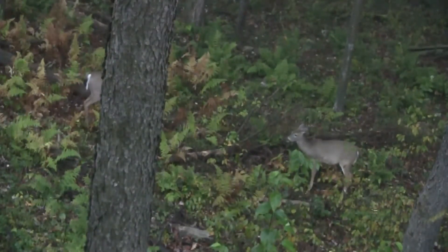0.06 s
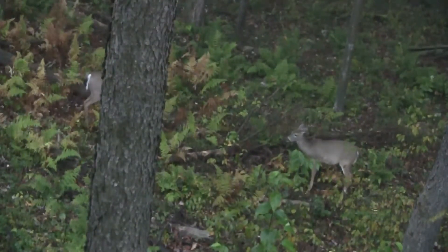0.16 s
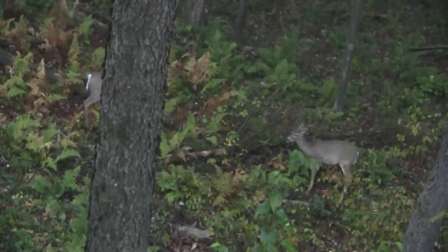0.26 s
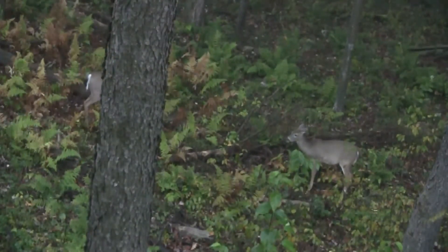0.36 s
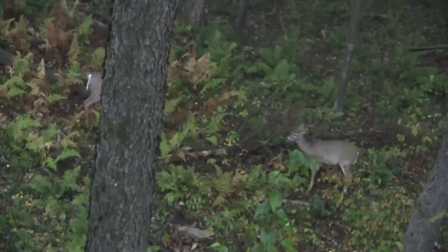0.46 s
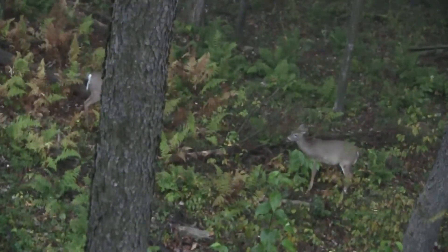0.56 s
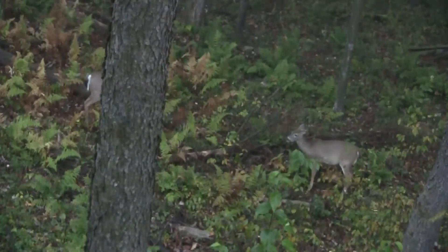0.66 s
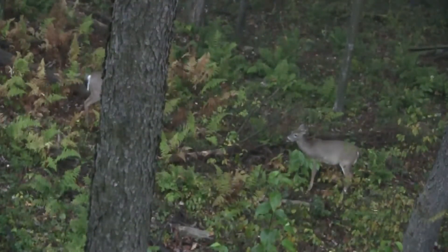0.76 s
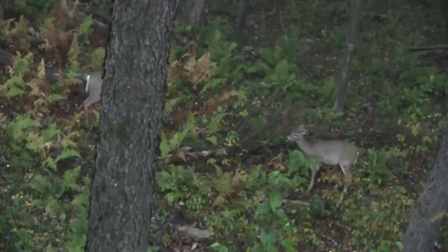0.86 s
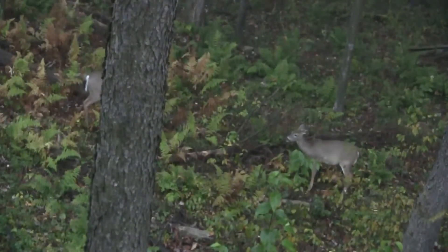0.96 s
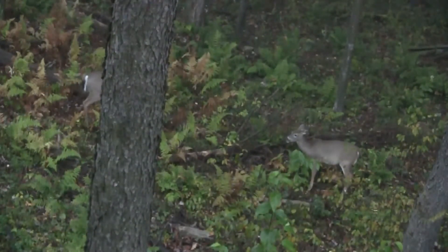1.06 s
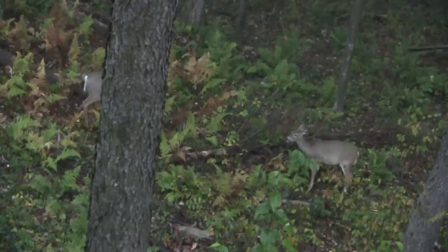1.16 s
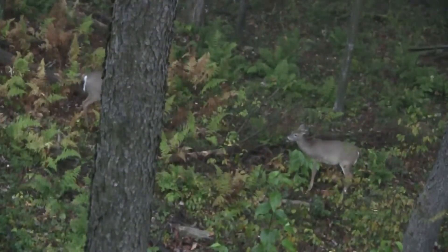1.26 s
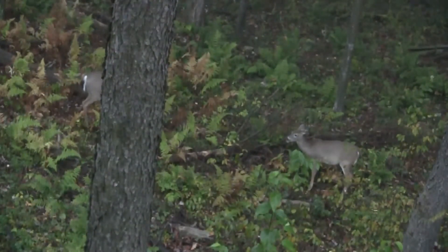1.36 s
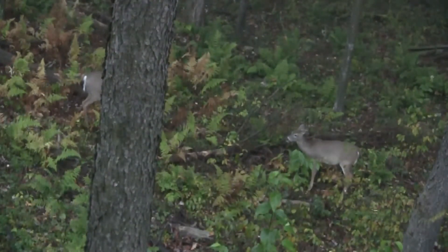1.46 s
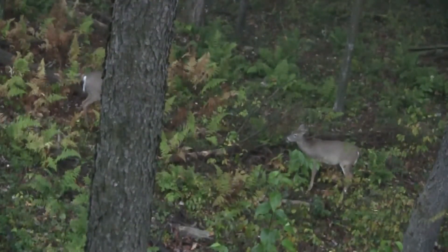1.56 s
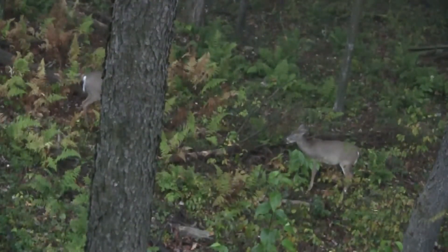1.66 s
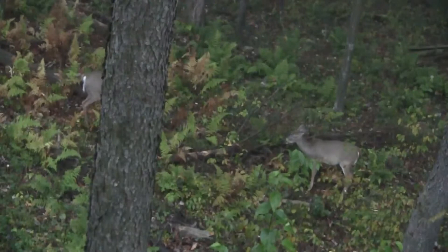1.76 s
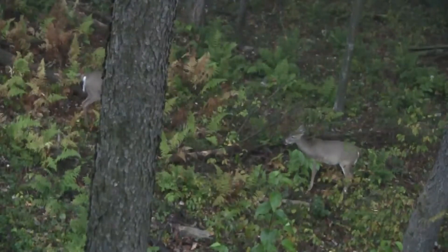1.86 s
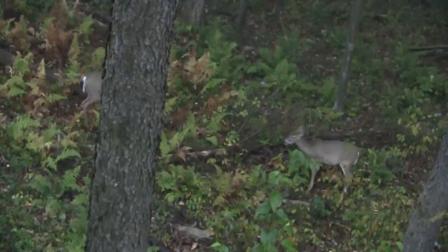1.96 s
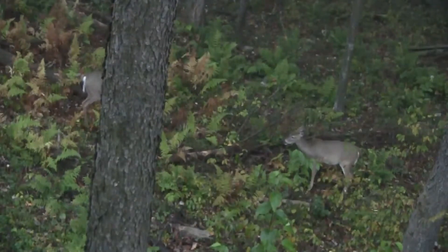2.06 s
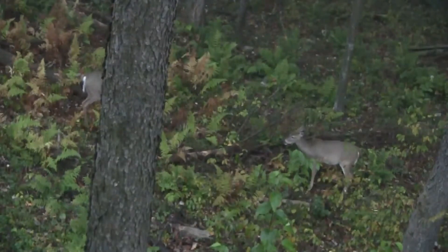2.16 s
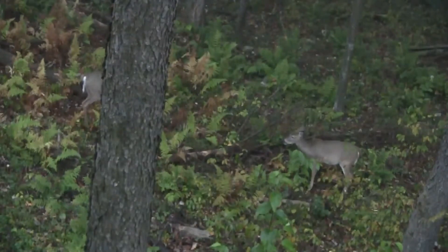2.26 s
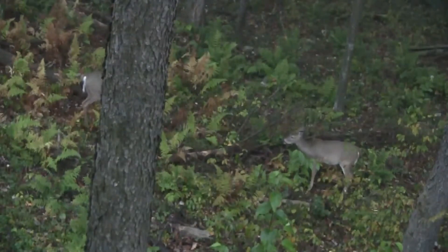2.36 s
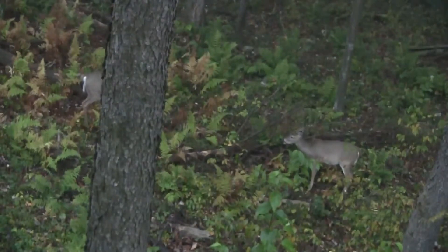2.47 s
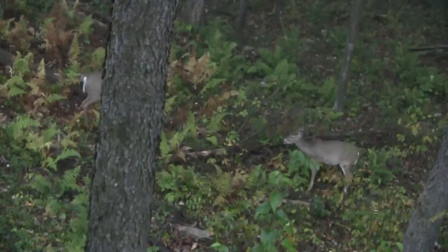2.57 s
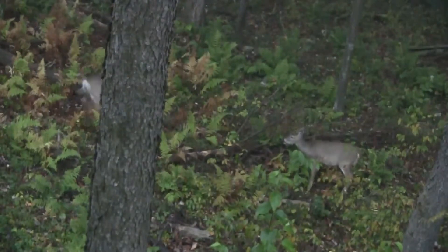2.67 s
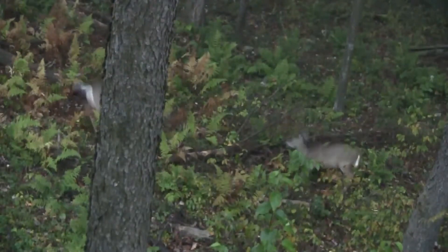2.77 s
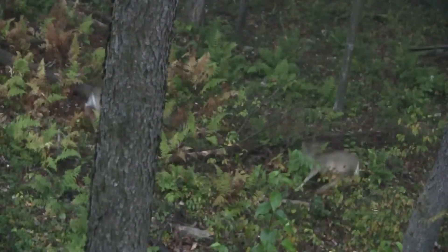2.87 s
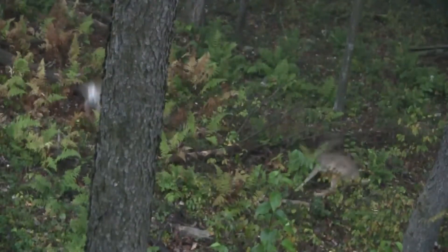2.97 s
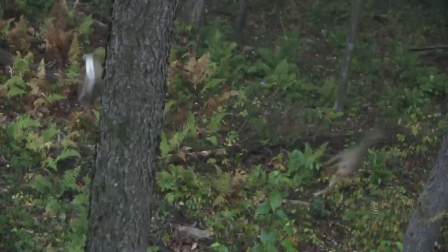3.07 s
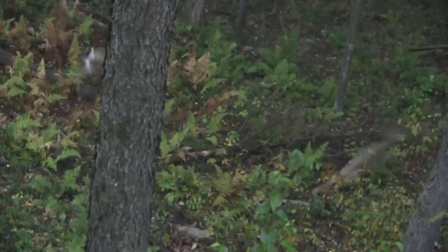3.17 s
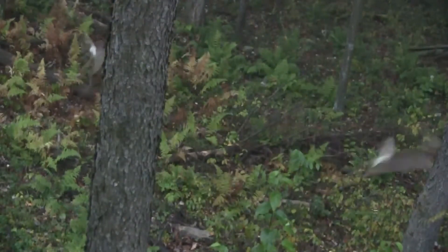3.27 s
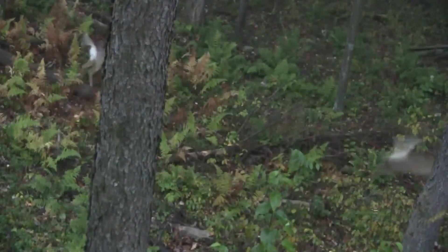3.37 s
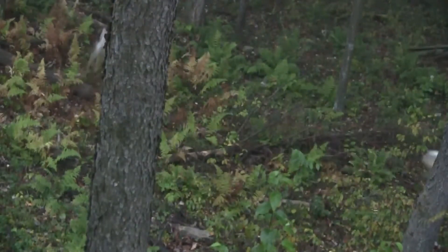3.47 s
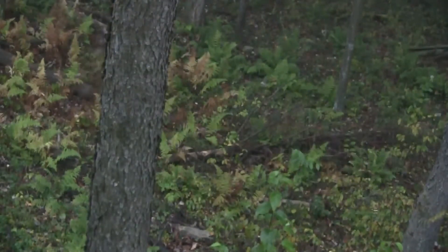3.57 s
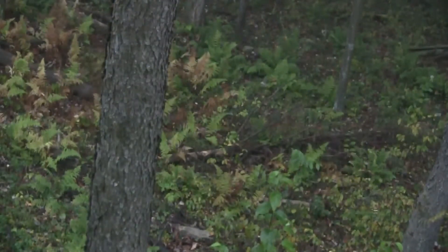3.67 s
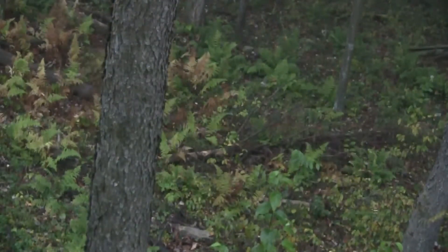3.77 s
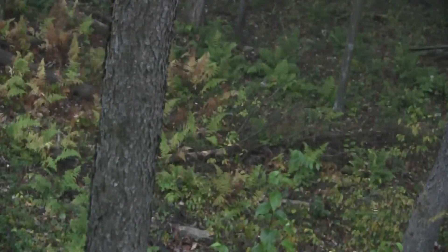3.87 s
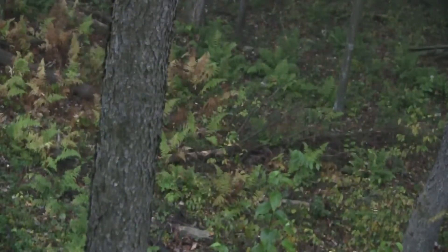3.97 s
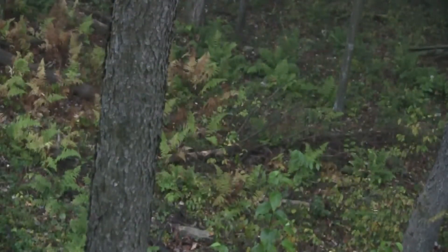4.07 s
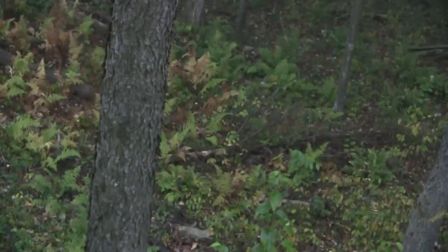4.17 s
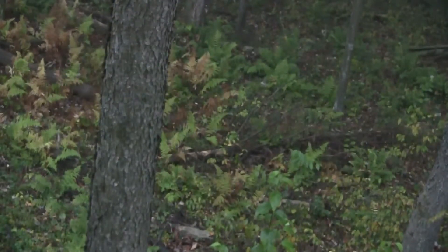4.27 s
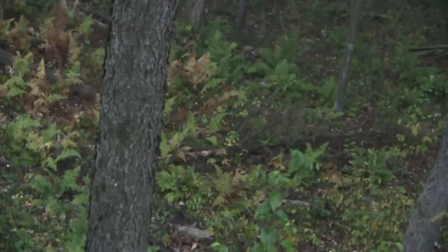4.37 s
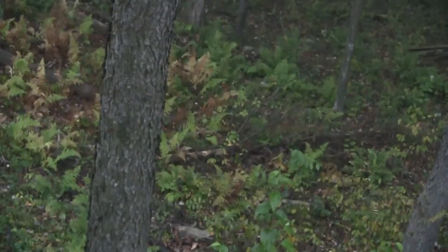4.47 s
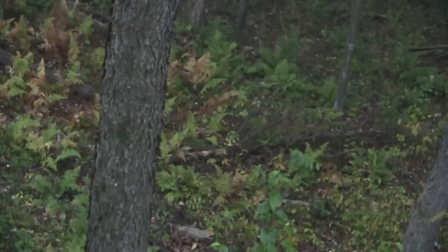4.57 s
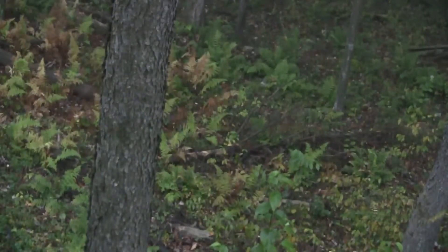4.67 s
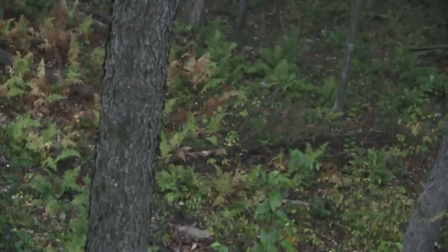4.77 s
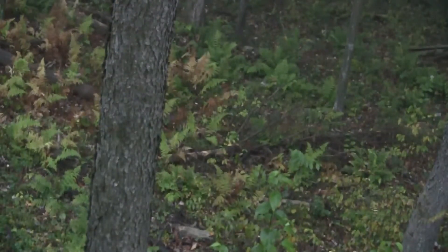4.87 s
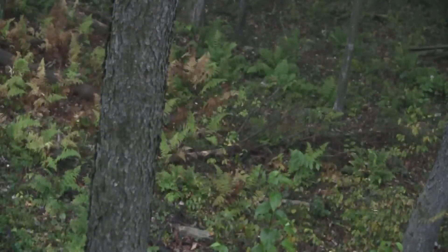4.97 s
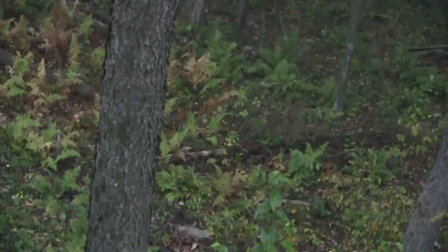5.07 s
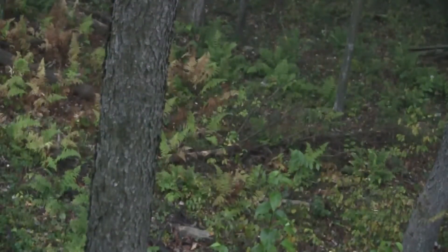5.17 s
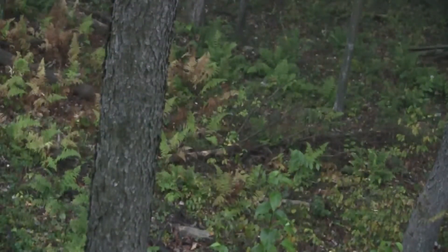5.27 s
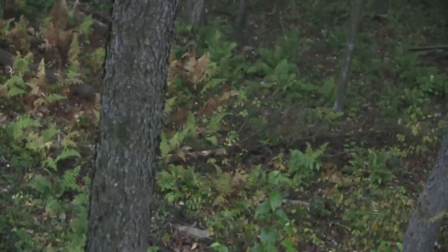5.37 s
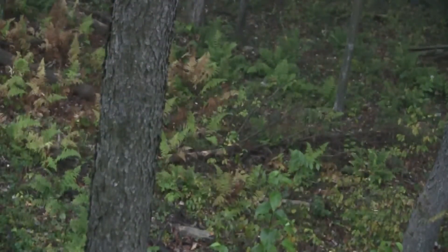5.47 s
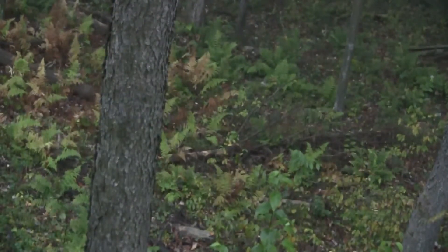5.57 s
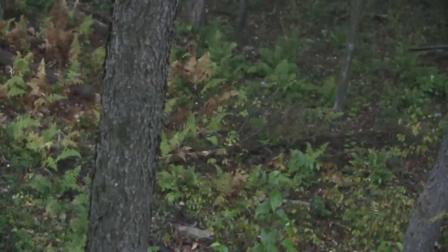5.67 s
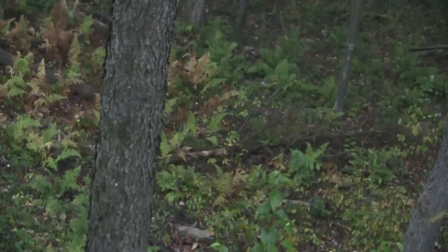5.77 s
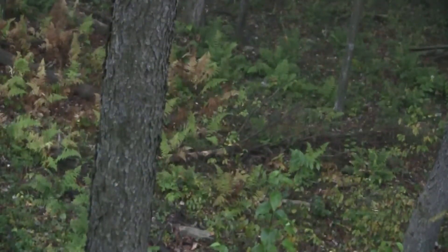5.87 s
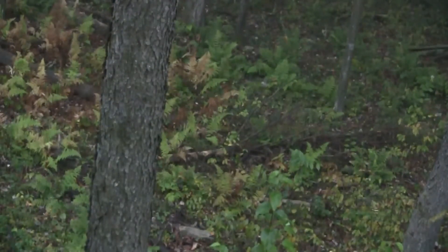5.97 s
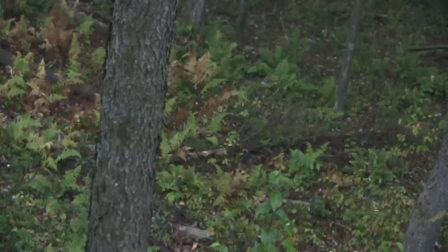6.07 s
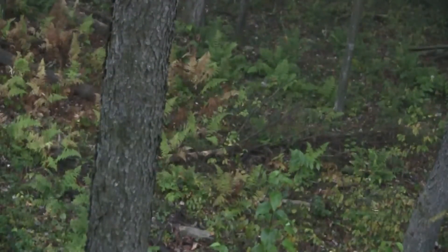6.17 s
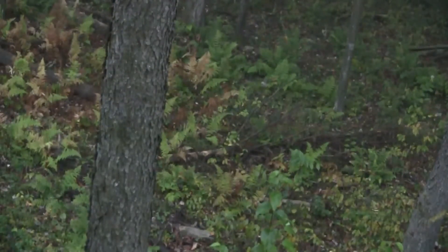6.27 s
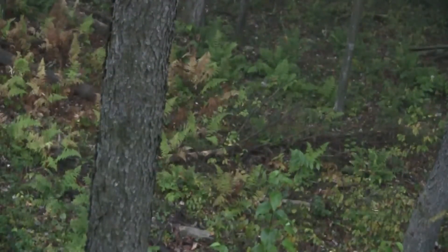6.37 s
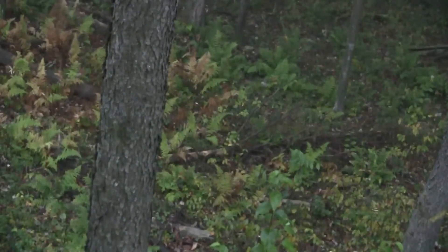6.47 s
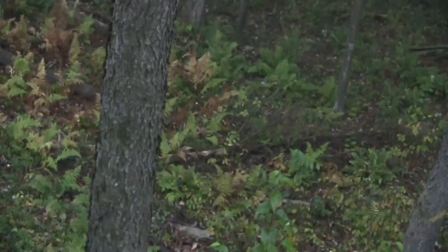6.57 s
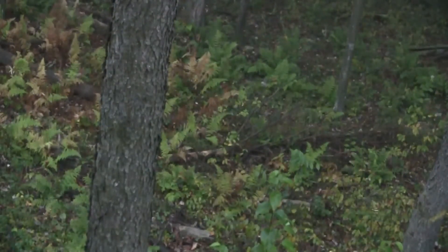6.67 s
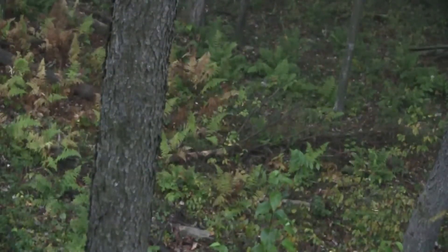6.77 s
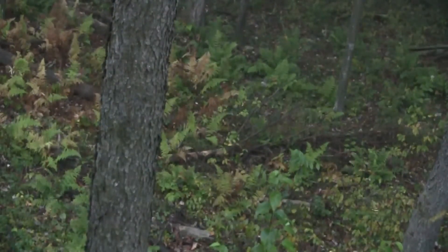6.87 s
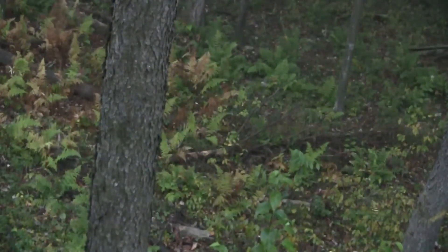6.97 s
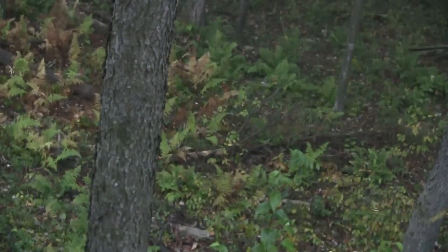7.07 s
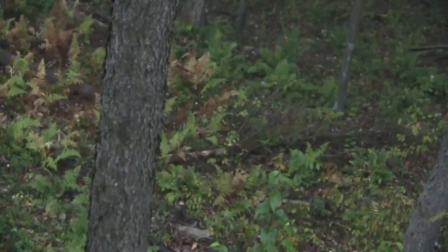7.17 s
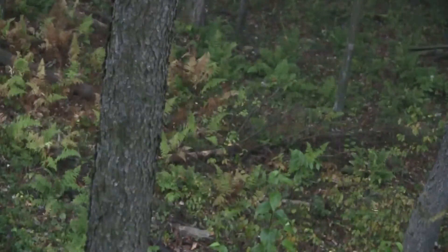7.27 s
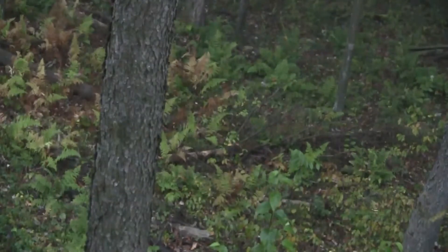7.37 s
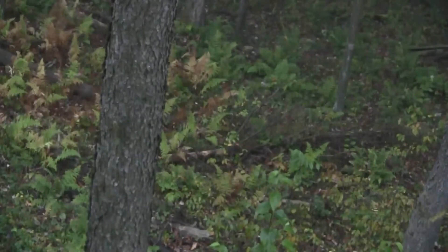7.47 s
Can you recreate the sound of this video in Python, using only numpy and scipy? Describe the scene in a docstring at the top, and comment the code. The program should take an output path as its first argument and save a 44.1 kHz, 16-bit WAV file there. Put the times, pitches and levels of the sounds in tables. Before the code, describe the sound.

A hushed wood, a sharp compound bow shot close by, arrow smack, branch crack and trunk knock, then deer crashing away through dry leaves.

```python
"""A quiet wood hushes over a faint drone that soon sinks a little; a few faint sticks snap and a small bird peeps.
A compound bow is shot close by: noise bursts through resonant bodies for release and slam, decaying sines for twang.
The arrow smacks home, cracks a branch and knocks on distant wood, each blow scattered back by a grainy tail.
Two deer bolt: filtered crackle swells with each bound through ferns and dry leaves, with sticks snapping as bursts."""
import sys
import numpy as np
from scipy import signal
from scipy.fft import rfft, irfft, next_fast_len
from scipy.io import wavfile
from scipy.ndimage import uniform_filter1d, map_coordinates

SR = 44100
rng = np.random.default_rng(int(sys.argv[2]) if len(sys.argv) > 2 else 0)


def bounce(signal):
    """Save signal as a 16-bit WAV file at the path given by the first command-line argument."""
    frames = np.transpose(np.atleast_2d(signal))
    limited = np.clip(frames, -1, 1)
    pcm = np.round(limited * 32767).astype(np.int16)
    wavfile.write(sys.argv[1], SR, pcm)


N = 332320

# All dB values in the tables are relative; every t60 is nominal.
# Colour of the hush. Each row: frequency in Hz, level in dB.
AIR_COLOUR_HZ_DB = [(15, -53), (25, -18), (53, -24), (72, -12), (134, -5), (166, -5.5), (200, -8.5),
                    (335, -4), (373, -3.5), (463, -5.5), (641, -7), (1740, -16), (2760, -20), (5430, -25.5),
                    (16000, -37.5)]
# Stereo likeness of the hush. Each row: frequency in Hz, left-right correlation.
AIR_ALIKE_HZ = [(25, 0.2), (60, 1), (150, 0.63), (380, -0.45), (950, -0.31), (2380, 0.14), (5980, 0.21),
                (15000, -0.18)]

# Decay of the echo among the trees. Each row: frequency in Hz, t60 in seconds.
WOOD_T60_HZ_S = [(150, 0.46), (600, 0.93), (2500, 0.91), (6000, 0.68), (14000, 0.5)]
# Colour of that echo. Each row: frequency in Hz, level in dB.
WOOD_ECHO_HZ_DB = [(100, 14), (300, -3), (700, -0.5), (3000, -1.5), (9000, 6.5), (15000, 6)]
# Stereo likeness of that echo. Each row: frequency in Hz, left-right correlation.
WOOD_ALIKE_HZ = [(200, 0.93), (1500, 0.98), (5000, 0.71), (14000, 0.07)]
# Stereo likeness of near sounds. Each row: frequency in Hz, left-right correlation.
NEAR_ALIKE_HZ = [(200, 1), (2000, 0.88), (5000, 0.3), (12000, 0.89)]
# Stereo likeness of far sounds. Each row: frequency in Hz, left-right correlation.
FAR_ALIKE_HZ = [(200, 0.97), (4000, 0.98), (12000, 0.23)]

# Bird peep. Each row: time in seconds, pitch in Hz, level in dB.
PEEP_S_HZ_DB = [(2.2, 2950, -69), (2.213, 3150, -65), (2.235, 3380, -58), (2.25, 3190, -55),
                (2.268, 3360, -57), (2.285, 3320, -65)]

# Bounds through the undergrowth. Each row: top in seconds, leaf, twig and ground levels in dB, swell in seconds.
BOUNDS = [(3.2, -56, -62, -49.5, 0.076), (3.39, -57, -54, -58, .05), (3.584, -55, -56, -55, 0.027),
          (3.75, -54, -54.5, -51, 0.1), (3.95, -57, -62, -60, 0.039), (4.14, -55.5, -54.5, -57, 0.035),
          (4.29, -46.5, -56.5, -57, 0.083), (4.53, -62, -63, -57, 0.022), (4.751, -55, -58, -53.5, 0.16),
          (4.961, -65, -58.5, -54, 0.024), (5.12, -55.5, -61.5, -56, 0.13), (5.35, -57.5, -59, -60, .04),
          (5.47, -52.5, -58.5, -54, 0.022), (5.76, -54.5, -59, -65, 0.054), (5.88, -56, -58, -63, 0.021),
          (6.08, -48.5, -52.5, -54, 0.067), (6.3, -63, -57.5, -56, 0.06),
          (6.45, -56.5, -56.5, -57.5, 0.048), (6.55, -62, -59.5, -62, 0.023), (6.72, -76, -54, -72, 0.016),
          (6.81, -58, -55, -69.5, 0.023), (7.0, -53, -50.5, -53.5, .12), (7.111, -52.5, -50, -52.5, 0.11),
          (7.479, -60, -56.5, -71, 0.049)]
# Heavy landings on soft soil. Each row: top in seconds, level in dB, swell in seconds, t60 in seconds.
LANDINGS = [(3.578, -57, 0.0053, 0.099), (3.686, -51, 0.0082, 0.09), (3.77, -58, 0.0067, 0.11),
            (3.832, -54, 0.0071, 0.13), (6.25, -56, .01, 0.11)]
# Colour of the soil under a landing. Each row: frequency in Hz, level in dB.
SOIL_COLOUR_HZ_DB = [(25, -45), (50, -22), (80, -3), (130, -3), (220, -5.5), (600, -23), (3000, -68)]
# Colour of swept leaves. Each row: frequency in Hz, level in dB.
LEAF_COLOUR_HZ_DB = [(500, -25), (1800, -10.5), (2900, -3.5), (3900, -4.5), (5200, -2.5), (6400, -5.5),
                     (8200, -13.5), (11500, -17), (15800, -26.5)]
# Colour of crunched twigs. Each row: frequency in Hz, level in dB.
TWIG_COLOUR_HZ_DB = [(250, -30), (600, -18), (900, 1), (1400, 3), (1900, -1.5), (2650, -1), (3600, -12.5),
                     (8000, -18), (15000, -47)]
# Colour of churned litter. Each row: frequency in Hz, level in dB.
GROUND_COLOUR_HZ_DB = [(40, -40), (90, -8), (200, -6.5), (330, -0.5), (480, 1), (700, 1), (1100, -8.5),
                       (3000, -28), (8000, -32)]
# Colour of ticking dry stems. Each row: frequency in Hz, level in dB.
TICK_COLOUR_HZ_DB = [(400, -25), (1000, -13), (2300, 12), (3800, -11.5), (5200, 2.5), (8000, -32),
                     (15000, -22)]
# Colour of the hiss of stirred fronds. Each row: frequency in Hz, level in dB.
SETTLING_COLOUR_HZ_DB = [(1500, -30), (5000, 0), (9000, 2), (15500, -5)]
# Stereo likeness of the rustle. Each row: frequency in Hz, left-right correlation.
RUN_ALIKE_HZ = [(60, 1), (150, 1), (380, 0.71), (950, 0.92), (2380, 0.96), (5980, 0.78), (15000, 0.048)]
STIR_LEAF_DB, STIR_TWIG_DB, STIR_GROUND_DB = -61, -62, -59.5  # unbroken rustle under the bounds, relative
BOUND_T60_S, SOIL_T60_S = 0.93, 0.54  # leaves and twigs; the litter settles sooner
HOOF_LEAD_S = 0.013  # the hoofs land before the leaves peak

# Breaking sticks. Each row: start in seconds, level in dB, pitch in Hz, width in octaves, splinter level in dB.
STICKS = [(0.118, -51.5, 1450, 0.46, -30), (0.35, -54, 900, 1.1, -28), (0.769, -57.5, 2520, 1.16, -20),
          (0.946, -45, 2180, 0.55, -16), (0.957, -48, 1840, 1.2, -26), (1.141, -53.5, 1100, 1.7, -24),
          (1.17, -52, 2260, 0.86, -20), (2.344, -55, 1280, 1, -18), (2.4, -53, 1540, 0.69, -13),
          (3.579, -50.5, 7000, 1.2, -10), (3.648, -42.5, 2630, 1.6, -11), (3.671, -40, 1070, 1.8, -22),
          (3.727, -44, 2770, 1.1, -15), (3.745, -40, 800, 2.3, -20), (3.896, -36, 2360, 0.86, -13),
          (4.08, -40, 980, 0.71, -18), (4.1, -37, 1880, 1.23, -38), (4.112, -42.5, 2220, 0.98, -28),
          (4.228, -33.5, 1540, 0.65, -28), (4.248, -37, 1580, 2.2, -20), (4.266, -31.5, 2140, 0.75, -16),
          (4.647, -44.5, 780, 2.1, -21), (5.014, -36.5, 790, 1.25, -27), (5.119, -39.5, 530, 1.5, -17),
          (5.135, -46.5, 3620, 0.78, -11), (5.314, -53, 4550, 0.79, -8), (5.442, -46, 900, 2.2, -13),
          (5.616, -33.5, 1070, 1.08, -29), (5.628, -37.5, 940, 1.3, -23), (5.912, -45.5, 4700, 0.31, -6),
          (6.01, -39, 2500, 0.42, -16), (6.051, -42, 1800, 0.74, -22), (6.091, -42, 3600, 0.36, -8),
          (6.552, -58, 9000, 1, -10), (6.86, -54, 8500, 1.0, -7), (7.065, -45.5, 1800, 0.76, -20.5),
          (7.283, -48, 2960, 0.79, -16)]
THUD_DB, THUD_DB_PER_OCTAVE = -10, -8  # thud of a 1 kHz stick; thin, high sticks take less weight to break
SNAP_T60_S, SNAP_GROWTH_POWER = 0.055, 0.38  # nominal t60 one octave wide; wide, ragged breaks last longer
SPRIG_DB, SPRIG_SCATTER_DB = -1.5, 2  # small sticks under each bound: level over its twigs, scatter
SPRIG_HZ, SPRIG_SCATTER_OCTAVES = 2600, .8  # middle pitch, furthest scatter
SPRIG_WIDTH_OCTAVES, SPRIG_SPLINTER_DB = .8, -13

# Arrow striking home. Each row: top in seconds, level in dB, swell in seconds, t60 in seconds.
SMACK = [(2.763, -21.5, 0.0028, 0.046), (2.7692, -23, 0.00074, 0.1), (2.7865, -25, 0.0023, 0.049),
         (2.7955, -32, 0.002, 0.18)]
# Arrow splitting a branch. Each row: top in seconds, level in dB, swell in seconds, t60 in seconds.
BRANCH = [(3.0385, -14.5, 0.0022, 0.019), (3.049, -31.5, 0.0084, 0.11)]
# Arrow ending on a trunk. Each row: top in seconds, level in dB, swell in seconds, t60 in seconds.
TRUNK = [(3.3015, -22.5, 0.00059, 0.054), (3.3085, -30, 0.001, 0.079)]
# Broad colour of the smack. Each row: frequency in Hz, level in dB.
SMACK_COLOUR_HZ_DB = [(41, -50), (70, -24), (126, -4), (199, -20), (360, 5), (649, -4), (892, -8.5),
                      (1020, -0.5), (1120, -4), (1850, -7.5), (2980, -13.5), (9270, -22.5), (16000, -41)]
# Broad colour of the branch. Each row: frequency in Hz, level in dB.
BRANCH_COLOUR_HZ_DB = [(88, -68), (150, -32), (716, -1.5), (888, -15), (1340, -1.5), (1600, -16),
                       (1760, -3.5), (3220, -4.5), (4000, -14), (4580, -11.5), (6140, -14.5), (10000, -12),
                       (16000, -28)]
# Broad colour of the trunk. Each row: frequency in Hz, level in dB.
TRUNK_COLOUR_HZ_DB = [(76, -62), (130, -34), (205, -50), (329, -4), (662, -1.5), (1100, -9.5), (1390, -12),
                      (1680, -19), (2270, -19), (2490, -18), (2960, -23), (5840, -39), (12000, -55),
                      (15600, -85), (22000, -120)]
# Resonances of the smack. Each row: frequency in Hz, width in Hz, height in dB.
SMACK_RING = [(393, 190, -2), (770, 240, 10.5), (1820, 210, 5.5)]
# Resonances of the branch. Each row: frequency in Hz, width in Hz, height in dB.
BRANCH_RING = [(1360, 310, 9.5), (1950, 360, 6), (3290, 530, 8), (4600, 430, 14.5), (5700, 950, 11.5)]
# Resonances of the trunk. Each row: frequency in Hz, width in Hz, height in dB.
TRUNK_RING = [(377, 150, 4), (553, 230, 8), (700, 68, 5.5), (1010, 150, 2), (1340, 210, 10),
              (2500, 350, 10.5)]
# The smack as the brush throws it back. Each row: frequency in Hz, level in dB.
SMACK_SPRAY_HZ_DB = [(100, -28), (250, -7.5), (420, -1), (950, -2.5), (1500, -1.5), (2500, -9),
                     (5000, -12.5), (9000, -20.5), (15000, -35)]
# Splinters flying into the leaves. Each row: frequency in Hz, level in dB.
BRANCH_SPRAY_HZ_DB = [(150, -23), (500, -1), (1400, 0), (3000, 3.5), (5000, -3.5), (10000, -7.5),
                      (12500, -13), (16000, -32)]

# Jolts of the bow's release. Each row: top in seconds, level in dB, swell in seconds, t60 in seconds.
RELEASE = [(2.4235, -23.5, 0.00087, 0.043), (2.4265, -20, 0.0023, 0.029)]
# String slam and limb rebound. Each row: top in seconds, level in dB, swell in seconds, t60 in seconds.
SLAM = [(2.4425, -10.5, 0.0054, 0.064), (2.458, -19.5, 0.0078, 0.069)]
# Broad colour of the release. Each row: frequency in Hz, level in dB.
RELEASE_COLOUR_HZ_DB = [(88, -66), (150, -11), (905, -2), (1560, -20), (1830, 3), (2550, -17), (2760, -9),
                        (3620, -3), (4080, -12), (5150, -6.5), (6640, -18), (8400, -7.5), (16000, -25)]
# Broad colour of the slam. Each row: frequency in Hz, level in dB.
SLAM_COLOUR_HZ_DB = [(35, -42), (60, -37), (139, -12), (924, -2), (1740, -7.5), (1860, -6), (2090, -10),
                     (2520, -3.5), (3040, -9), (4220, -4), (5460, -18), (6000, -11), (6430, -10),
                     (11500, -20), (16000, -20)]
# Resonances of the bow's riser. Each row: frequency in Hz, width in Hz, height in dB.
RISER_RING = [(337, 190, 7), (926, 59, 3), (1250, 170, -6), (1930, 200, 3), (2580, 450, 3), (3340, 330, 2),
              (4180, 930, -2), (5380, 500, 13.5)]
# Modes of string and limbs. Each row: frequency in Hz, level in dB, t60 in seconds.
TWANG_MODES = [(158.7, -22, 0.23), (175, -41, .14), (315, -36.5, 0.22), (700, -18, 0.14), (827, -19, 0.075),
               (1260, -28, 0.12), (2840, -11.5, 0.07)]
# The shaft racing over its rest. Each row: time in seconds, pitch in Hz, level in dB.
ZIP_S_HZ_DB = [(2.438, 2713, -32), (2.44, 3210, -14), (2.4413, 3810, -10), (2.4435, 4390, -8.5),
               (2.4455, 5300, -14), (2.448, 5370, -11)]

TOP_HZ = 16000


def amp(db):
    """Decibels to gain."""
    return 10 ** (np.asarray(db) / 20)


def unit(x):
    """Scaled to rms 1."""
    return x / np.sqrt(np.mean(x ** 2) + 1e-20)


def along(points, hz):
    """(Hz, value) points read on a log axis."""
    point_hz, value = np.transpose(points)
    return np.interp(np.log(hz + 1), np.log(point_hz + 1), value)


def clock():
    """The time of every sample in seconds."""
    return np.arange(N) / SR


def wobble(rate_hz):
    """A smooth random curve through rate_hz knots a second."""
    knots = rng.standard_normal(int(N * rate_hz / SR) + 4)
    return map_coordinates(knots, [clock() * rate_hz])


def filtered(x, response):
    """x times a response of frequency."""
    size = next_fast_len(x.shape[-1] + SR // 8)
    spectrum = rfft(x, size) * response(np.fft.rfftfreq(size, 1 / SR))
    return irfft(spectrum, size)[..., :x.shape[-1]]


def spread(pair, alike):
    """Two unrelated signals mixed to left and right of a given likeness."""
    def mid_side_gains(hz):
        turn = np.arccos(np.clip(along(alike, hz), -1, 1)) / 2
        return np.array([np.cos(turn), np.sin(turn)])

    mid, side = filtered(pair, mid_side_gains)
    return np.array([mid + side, mid - side])


def add(track, start_s, sound):
    """Mix a sound into a track at start_s."""
    part = track[:, max(round(start_s * SR), 0):][:, :sound.shape[1]]
    part += sound[:, :part.shape[1]]


def body(colour, rings):
    """Gain in dB of a broad colour with resonances standing on it."""
    def gain_db(hz):
        peaks_db = sum(db / (1 + (2 * (hz - ring_hz) / width_hz) ** 2) for ring_hz, width_hz, db in rings)
        return along(colour, hz) + peaks_db

    return gain_db


def causal_response(gain_db, size):
    """Minimum-phase spectrum of a body, by folding its cepstrum."""
    gain = amp(gain_db(np.fft.rfftfreq(size, 1 / SR)))
    cepstrum = irfft(np.log(np.maximum(unit(gain), 1e-6)))
    fold = np.r_[1, np.full(size // 2 - 1, 2), 1, np.zeros(size // 2 - 1)]
    return np.exp(rfft(cepstrum * fold))


def blows(rows, gain_db, alike, snap=0, size=8192):
    """Each blow is a burst of tiny contacts through a causal body; snap is the share of one clean fracture."""
    response = causal_response(gain_db, size)
    top = size // 16
    t = (np.arange(size) - top) / SR
    snap = np.clip(snap, 0, 1)
    track = np.zeros((2, N))
    for top_s, db, swell_s, t60_s in rows:
        shape = np.exp(-(np.minimum(t, 0) / swell_s) ** 2) * amp(-60 * np.maximum(t, 0) / t60_s)
        contacts = shape * rng.standard_normal((2, size))
        even = irfft(np.exp(1j * np.angle(rfft(contacts))))  # excites all pitches alike
        burst = np.sqrt(1 - snap) * unit(even * np.sqrt(shape))
        burst[0, top] += np.sqrt(snap * size)
        burst *= amp(db) * np.sqrt(np.mean(shape ** 2))
        add(track, top_s + t[0], spread(irfft(rfft(burst) * response), alike))
    return track


def wood(x, onset_s, grain_db):
    """Trunks and leaves scatter a sound back: a one-second grainy tail that builds up over onset_s."""
    t = np.arange(SR) / SR
    knots = SR // 150
    trunks = amp(grain_db * np.interp(t, np.linspace(0, 1, knots), rng.standard_normal(knots)))
    hz, when_s, z = signal.stft(rng.standard_normal((2, SR)) * trunks, SR, nperseg=256)
    decay_db = 60 * when_s / along(WOOD_T60_HZ_S, hz)[:, None]
    fade = amp(along(WOOD_ECHO_HZ_DB, hz)[:, None] - decay_db)
    tail = signal.istft(z * fade, SR, nperseg=256)[1][:, :SR]
    tail = spread(tail * (1 - np.exp(-(t / onset_s) ** 2)), WOOD_ALIKE_HZ)
    return signal.fftconvolve(x.mean(0)[None], tail / np.linalg.norm(tail[0]), axes=1)[:, :N]


def rush(source, spectrum, alike, patchy_db):
    """A stereo rush of rms 1 whose colour drifts in random patches."""
    z = signal.stft(source, nperseg=512)[2]
    field = uniform_filter1d(rng.standard_normal(z.shape[1:]), 7, 0)  # over frequency
    field = uniform_filter1d(field, 8, 1)  # over time
    pair = signal.istft(z * amp(patchy_db * unit(field)), nperseg=512)[1][:, :N]
    return unit(spread(filtered(pair, lambda hz: amp(along(spectrum, hz))), alike))


def grains(per_second, size_db):
    """Sparse clicks of very unequal size."""
    sizes = amp(size_db * np.minimum(rng.exponential(size=(2, N)), np.pi))
    hits = rng.random((2, N)) < per_second / SR
    return unit(hits * sizes * rng.choice([-1, 1], (2, N)))


def rustle(level_db, spectrum, per_second, size_db, blur, flutter_db):
    """Countless small breaks, partly blurred into noise, under a fluttering level."""
    crackle = unit(grains(per_second, size_db) + blur * rng.standard_normal((2, N)))
    level = amp(level_db + flutter_db * wobble(55))
    return level * rush(crackle, spectrum, RUN_ALIKE_HZ, patchy_db=1.0)


def glide(rows):
    """A pure tone that follows (s, Hz, dB) rows, alike in both channels."""
    s, hz, db = np.transpose(rows)
    t = clock()
    phase = 2 * np.pi * np.cumsum(np.interp(t, s, hz)) / SR
    tone = amp(np.interp(t, s, db)) * np.sin(phase)
    return np.tile(tone * (t > s[0]) * (t < s[-1]), (2, 1))


def swells(tops_s, levels_db, rises_s, t60_s, stir_db):
    """Level in dB of bounds that swell and die away over a steady stir, summed as power."""
    t = clock()
    power = np.full(N, amp(stir_db) ** 2)
    for top_s, db, rise_s in zip(tops_s, levels_db, rises_s):
        near = slice(max(round((top_s - .5) * SR), 0), round((top_s + 1) * SR))
        age = t[near] - top_s
        rise = np.exp(-(np.minimum(age, 0) / rise_s) ** 2)
        power[near] += (rise * amp(db - 60 * np.maximum(age, 0) / t60_s)) ** 2
    return 10 * np.log10(power)


def air(drone_hz=382, width_hz=22):
    """The hush of the wood as patchy noise, with a faint distant drone of narrow-band noise."""
    noise = rng.standard_normal((2, N))
    level = amp(-55.5 + 0.18 * wobble(3.4))
    hush = level * rush(noise, AIR_COLOUR_HZ_DB, AIR_ALIKE_HZ, patchy_db=1.87)
    resonance = lambda hz: 1 / (1 + ((hz - drone_hz) / width_hz) ** 2)
    drone = unit(filtered(rng.standard_normal((2, N)), resonance))
    return hush + amp(np.interp(clock(), [.8, 1.6], [-64.5, -67.5])) * drone


def bird():
    """One thin wavering peep, a gliding sine, from far among the trees."""
    peep = amp(-3.0) * glide(PEEP_S_HZ_DB)
    return peep + amp(1) * wood(peep, onset_s=.012, grain_db=1)


def undergrowth():
    """With each bound the hoofs churn the soft litter, crunch dead twigs and sweep through leaves."""
    tops_s, leaf_tops_db, twig_tops_db, ground_tops_db, rises_s = np.transpose(BOUNDS)
    leaf_db = swells(tops_s, leaf_tops_db, rises_s, BOUND_T60_S, STIR_LEAF_DB)
    twig_db = swells(tops_s, twig_tops_db, rises_s, BOUND_T60_S, STIR_TWIG_DB)
    ground_db = swells(tops_s - HOOF_LEAD_S, ground_tops_db, rises_s, SOIL_T60_S, STIR_GROUND_DB)
    leaves = rustle(leaf_db, LEAF_COLOUR_HZ_DB, per_second=1300, size_db=-2.0, blur=1.0, flutter_db=1.34)
    twigs = rustle(twig_db, TWIG_COLOUR_HZ_DB, per_second=400, size_db=2, blur=1.0, flutter_db=1.5)
    ground = rustle(ground_db, GROUND_COLOUR_HZ_DB, per_second=250, size_db=2.5, blur=1.54, flutter_db=1.75)
    # single dry stems tick wherever leaves and twigs are pressed together
    tick_db = (leaf_db + twig_db) / 2
    ticks = rustle(tick_db, TICK_COLOUR_HZ_DB, per_second=70, size_db=2.5, blur=0, flutter_db=3.0)
    # stirred fronds keep up a fine hiss between the bounds
    settling = rustle(-68, SETTLING_COLOUR_HZ_DB, per_second=4100, size_db=2, blur=1.9, flutter_db=-0.5)
    crashing = amp(0.5) * leaves + amp(0.84) * twigs + ground + amp(-13.0) * ticks + settling
    bolting = np.interp(clock(), [2.75, 3.3], [0, 1])
    return bolting * crashing + blows(LANDINGS, body(SOIL_COLOUR_HZ_DB, []), FAR_ALIKE_HZ)


def sprigs(count=3, scatter_s=.045):
    """Every bound also breaks a few small sticks of chance size, as rows like those of STICKS."""
    chance = rng.standard_normal((len(BOUNDS), count, 3))
    rows = []
    for (top_s, _, twig_db, _, _), draws in zip(BOUNDS, chance):
        for when, force, thinness in draws:
            db = twig_db + SPRIG_DB + SPRIG_SCATTER_DB * force
            pitch_hz = SPRIG_HZ * 2 ** (SPRIG_SCATTER_OCTAVES * np.tanh(thinness))
            rows.append((top_s + scatter_s * when, db, pitch_hz, SPRIG_WIDTH_OCTAVES, SPRIG_SPLINTER_DB))
    return rows


def hump(hz, centre_hz, octaves):
    """A smooth band of rms 1 around a pitch."""
    return unit(1 / (1 + (np.log2((hz + 1) / centre_hz) / octaves) ** 4))


def sticks(thud_hz=400, splinter_hz=6500, delay_s=0.000997):
    """A stick snaps around its pitch just after its listed start, with a thud from the soil and a splinter spray."""
    snaps = np.zeros((2, N))
    for start_s, db, pitch_hz, octaves, splinter_db in STICKS + sprigs():
        thud_db = THUD_DB + THUD_DB_PER_OCTAVE * np.log2(pitch_hz / 1000)
        t60_s = SNAP_T60_S * octaves ** SNAP_GROWTH_POWER

        def gain_db(hz):
            thud = amp(thud_db) * hump(hz, thud_hz, 0.96)
            splinters = amp(splinter_db) * hump(hz, splinter_hz, 0.57)
            return 20 * np.log10(hump(hz, pitch_hz, octaves) + thud + splinters)

        clean = np.interp(pitch_hz, [1000, 2300], [.12, .5])  # thin dry sticks break at once, thick ones crunch
        snaps += blows([(start_s + delay_s, db, .0004, t60_s)], gain_db, FAR_ALIKE_HZ, snap=clean)
    echo = wood(snaps, onset_s=0.0032, grain_db=-2.0)
    return amp(2) * snaps * amp([[.3], [-.3]]) + amp(-5.5) * echo


def arrow():
    """The arrow strikes the deer, splits a branch and ends against a trunk; the brush scatters each blow."""
    smack = blows(SMACK, body(SMACK_COLOUR_HZ_DB, SMACK_RING), FAR_ALIKE_HZ, snap=0.37)
    crack = blows(BRANCH, body(BRANCH_COLOUR_HZ_DB, BRANCH_RING), FAR_ALIKE_HZ, snap=0.19)
    knock = blows(TRUNK, body(TRUNK_COLOUR_HZ_DB, TRUNK_RING), FAR_ALIKE_HZ, snap=0.48)
    # the sprays are heard only through their echoes
    smack_spray = blows(SMACK[:1], body(SMACK_SPRAY_HZ_DB, []), FAR_ALIKE_HZ, snap=0.98)
    crack_spray = blows(BRANCH[:1], body(BRANCH_SPRAY_HZ_DB, []), FAR_ALIKE_HZ, snap=0.91)
    echoes = amp(-2.5) * wood(smack_spray, onset_s=0.052, grain_db=1.0)
    echoes += amp(-3.5) * wood(crack_spray, onset_s=0.0049, grain_db=1.5)
    echoes += amp(-7.5) * wood(knock, onset_s=0.028, grain_db=-0.5)
    return (smack + crack + knock) * amp([[.3], [-.3]]) + echoes


def twang(start_s):
    """String and limbs ring down as decaying sines with a soft onset."""
    t = np.maximum(clock() - start_s, 0)
    ringing = sum(amp(db - 60 * t / t60_s) * np.sin(2 * np.pi * hz * t) for hz, db, t60_s in TWANG_MODES)
    return ringing * (1 - np.exp(-t / 0.012))


def bow(lag_s=.00004, side_db=1.0, buzz_db=-35, buzz_t60_s=0.39, dull_hz=11000):
    """The release trips, the shaft zips off, the string slams into its stop and the limbs ring down."""
    riser = body(SLAM_COLOUR_HZ_DB, RISER_RING)
    stop_s = SLAM[0][0]
    jolts = blows(RELEASE, body(RELEASE_COLOUR_HZ_DB, []), NEAR_ALIKE_HZ) + blows(SLAM, riser, NEAR_ALIKE_HZ)
    # loose fittings shiver on
    buzz = blows([(stop_s + 0.015, buzz_db, .006, buzz_t60_s)], riser, WOOD_ALIKE_HZ)
    ring = twang(stop_s - 0.0049)
    # just left of centre: the left channel leads and is louder
    lead = lambda hz: np.exp(1j * np.pi * lag_s * np.array([hz, -hz]))
    near = filtered(jolts + glide(ZIP_S_HZ_DB) + buzz + ring, lead)
    # the trees are far, so their answer comes late and dull
    dulled = filtered(jolts + ring, lambda hz: 1 / np.hypot(1, hz / dull_hz))
    answer = wood(dulled, onset_s=0.21, grain_db=3.0)
    return near * amp([[side_db], [-side_db]]) + amp(-24.5) * answer


def scene():
    """Everything that sounds in the wood."""
    return bow() + arrow() + sticks() + undergrowth() + bird() + air()


def record(dry):
    """The highest peaks are rounded off and a steep low-pass ends the band at TOP_HZ."""
    rounded = dry / (1 + np.abs(dry / .9) ** 4) ** (1 / 4)
    return filtered(rounded, lambda hz: 1 / (1 + (hz / TOP_HZ) ** 120))


dry = scene()
out = record(dry)
bounce(out)
```